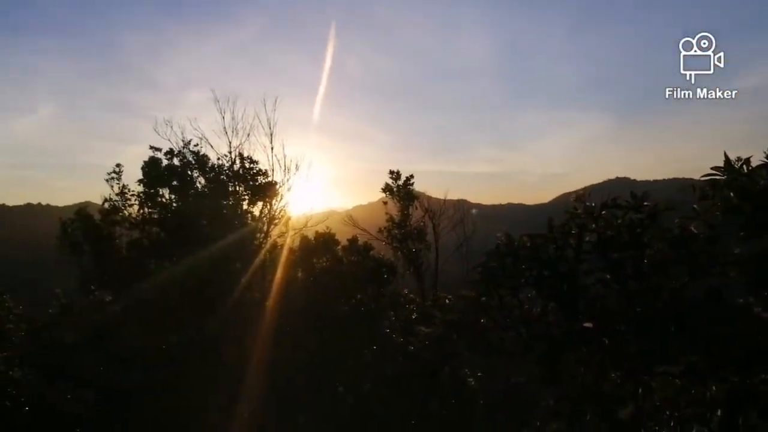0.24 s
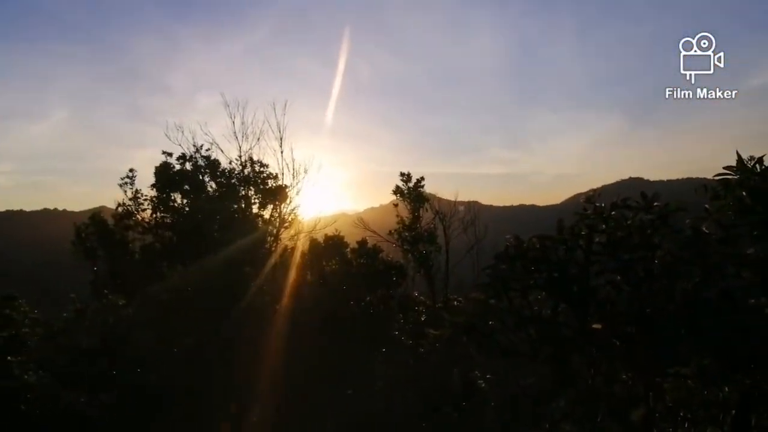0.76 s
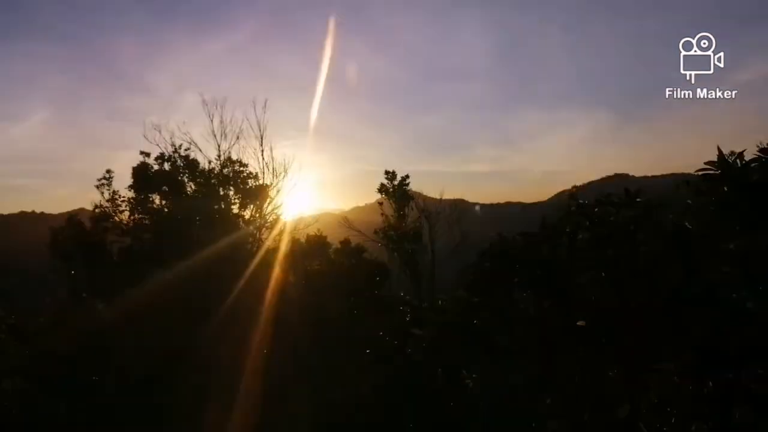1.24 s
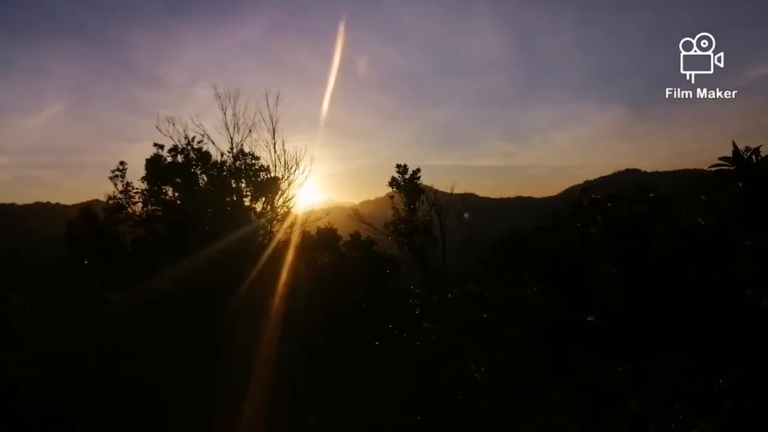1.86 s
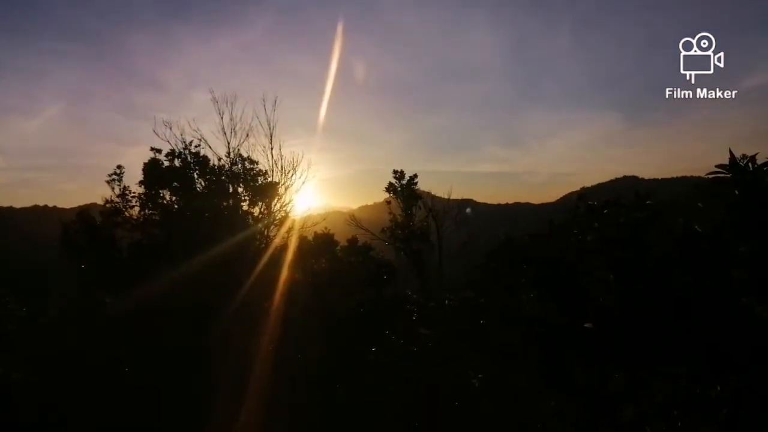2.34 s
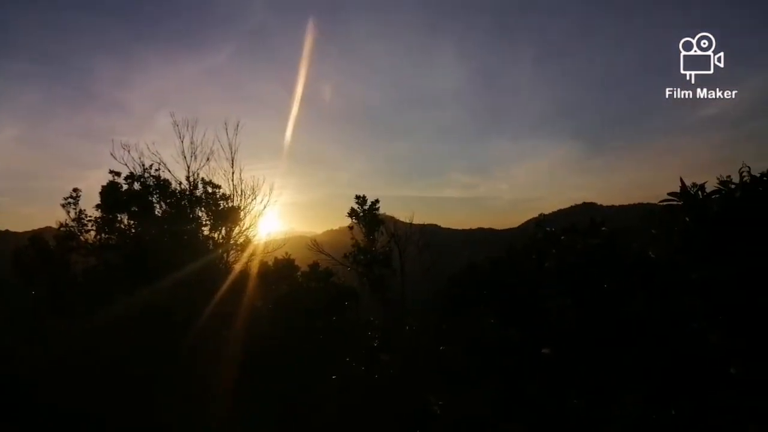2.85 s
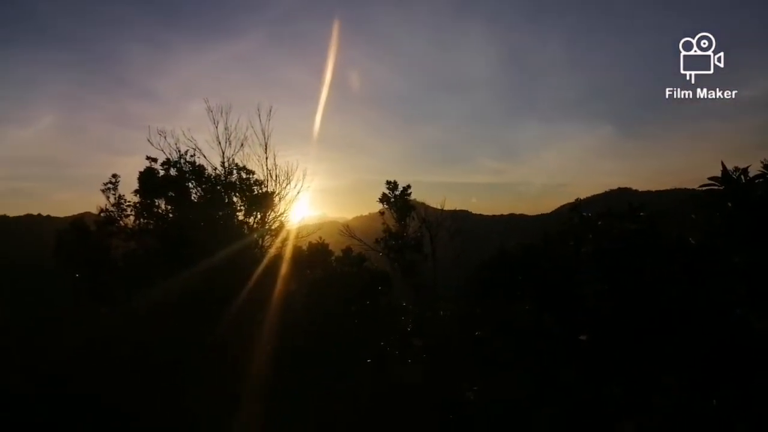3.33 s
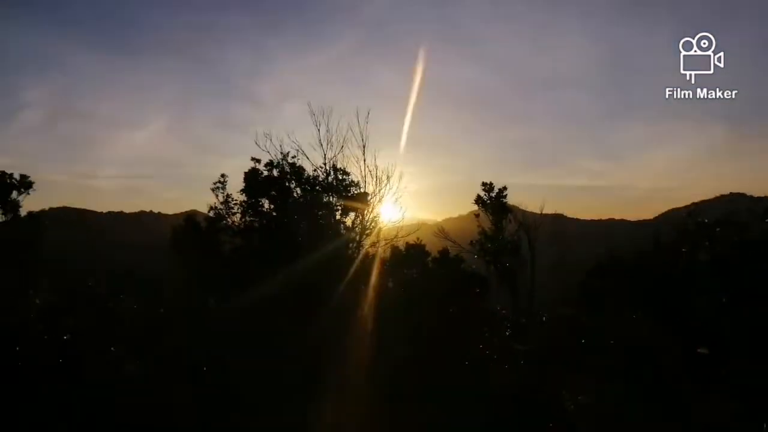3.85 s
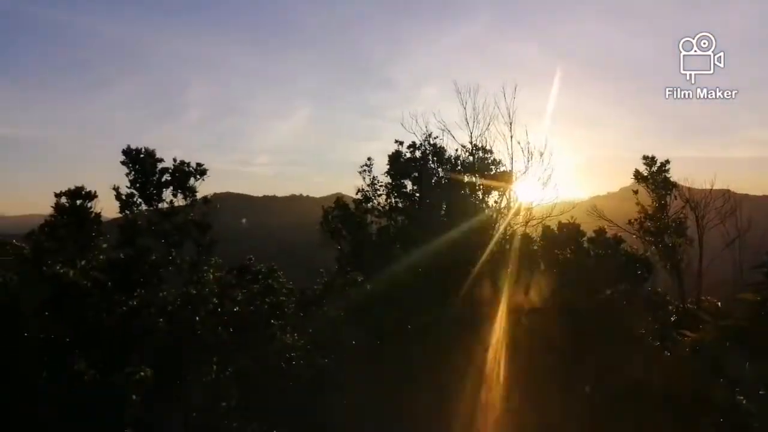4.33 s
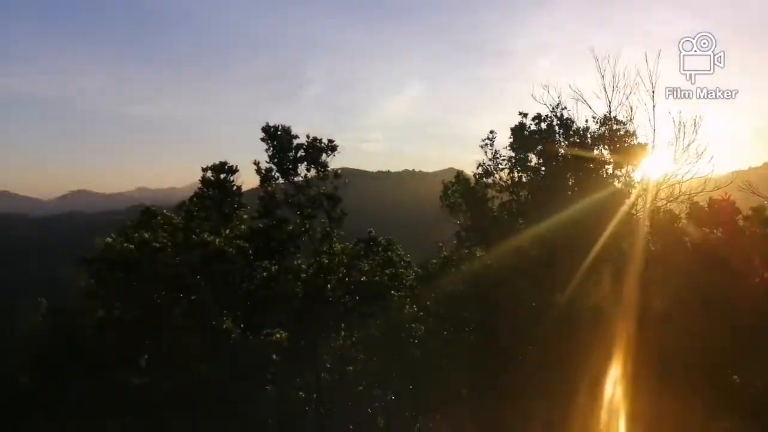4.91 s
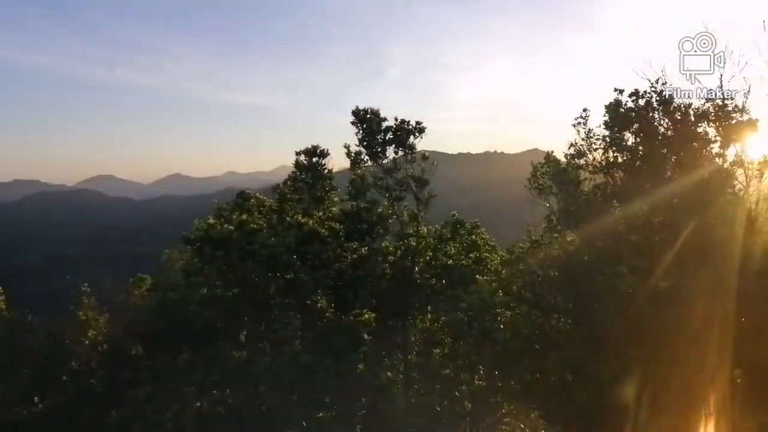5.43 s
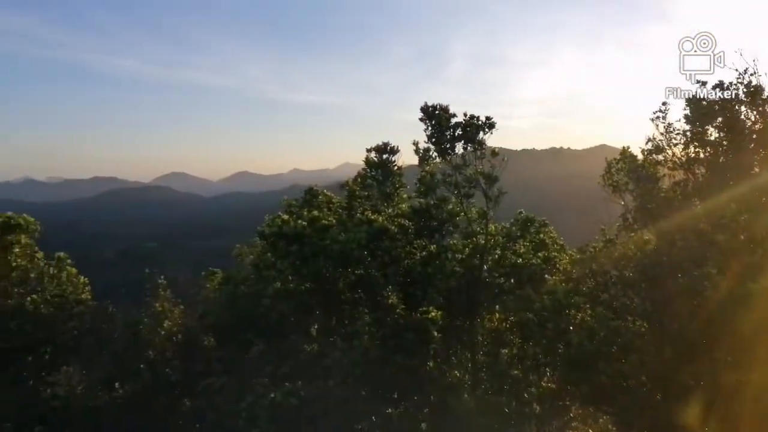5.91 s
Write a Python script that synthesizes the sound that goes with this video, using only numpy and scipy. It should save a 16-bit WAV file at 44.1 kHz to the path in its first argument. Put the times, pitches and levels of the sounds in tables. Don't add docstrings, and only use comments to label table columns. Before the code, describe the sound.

A stereo phone recording outdoors among trees: after two soft tries, a small bird on the right settles into regular, crisp chips, loudest past the middle, then duller as it turns away while neighbours answer more strongly. Far birds whistle thinly with short leafy echoes. A low insect wing hum comes and goes beneath, with soft wind rumble, a pop on the left, small ticks, one sharp clack and late dull thuds.

```python
import sys
import numpy as np
from scipy import signal
from scipy.fft import rfft, irfft, next_fast_len
from scipy.io import wavfile
from scipy.ndimage import uniform_filter1d, map_coordinates

SR = 44100
rng = np.random.default_rng(int(sys.argv[2]) if len(sys.argv) > 2 else 0)


def rack_gain(trim_db):
    fader = np.asarray(trim_db, float)
    return 10 ** (fader / 20)


def wav_out(sig):
    wavfile.write(sys.argv[1], SR, np.round(np.clip(np.atleast_2d(sig).T, -1, 1) * 32767).astype(np.int16))


N = 272097
TIME = np.arange(N) / SR

# time in seconds, level in dB.
FLOCK = [(0, -101), (.2, -73), (.4, -79), (.7, -84.5), (2.3, -93.5), (2.84, -90.5), (2.97, -77),
         (3.2, -87.5), (3.37, -82.5), (4.24, -75), (5.5, -84), (6.17, -76.5)]


def unit(x):
    return x / np.sqrt(np.mean(x ** 2) + 1e-20)


def along(points, hz):
    f, value = np.transpose(points)
    return np.interp(np.log(hz + 1), np.log(f + 1), value)


def flock_db():
    return np.interp(TIME, *np.transpose(FLOCK))


def wobble(rate):
    return map_coordinates(rng.standard_normal(int(N * rate / SR) + 4), [np.arange(N) * rate / SR])


def rasp(n, depth_db):
    knots = rng.standard_normal(n // 120 + 4)
    return rack_gain(depth_db * map_coordinates(knots, [np.arange(n) / 120]))


def filtered(x, response):
    m = next_fast_len(N + SR // 2)
    return irfft(rfft(x, m) * response(np.fft.rfftfreq(m, 1 / SR)), m)[..., :N]


def sides(pan_db):
    pair = rack_gain([[pan_db / 2], [-pan_db / 2]])
    return pair / pair.mean()


def add(track, s, sound):
    part = track[:, max(round(s * SR), 0):][:, :sound.shape[1]]
    part += sound[:, :part.shape[1]]


def bearing(s):
    # time in seconds, left-right balance in dB.
    turning = [(0, -15.5), (1, -16), (1.8, -15.5), (2.6, -18.5), (3.35, -14), (3.7, -10.5), (4.7, -11.5),
               (5.2, -8), (6.17, -11.5)]
    return np.interp(s, *np.transpose(turning))


def tails(count):
    # frequency in Hz, time to fall 60 dB in seconds.
    slopes = [(1000, 0.039), (2700, 0.35), (5500, 0.33), (9000, 0.24)]
    # frequency in Hz, echo colour in dB.
    echo_colour = [(2000, 1), (2700, 0.26), (5500, -0.5), (8200, 4.5), (14000, 10)]
    build_s = 0.008
    hz, t, z = signal.stft(rng.standard_normal((count, 2, SR * 2 // 5)), SR, nperseg=256)
    decay = rack_gain(-60 * t / along(slopes, hz)[:, None])
    plain = z * decay * (1 - np.exp(-t / build_s))
    coloured = plain * rack_gain(along(echo_colour, hz))[:, None]
    tail = signal.istft(coloured, SR, nperseg=256)[1]
    colour_gain = np.linalg.norm(coloured) / np.linalg.norm(plain)
    return tail / np.linalg.norm(tail, axis=2, keepdims=True) * colour_gain


def placed(note, tail, pan_db, echo_db, spread, stir_db=0):
    out = rack_gain(echo_db) * sides(spread * pan_db) * signal.fftconvolve(note[None], tail, axes=1)
    if stir_db:
        out *= unit(np.array([rasp(out.shape[1], stir_db), rasp(out.shape[1], stir_db)]))
    left, right = sides(1.92 * pan_db)
    add(out[:1], 0, left * note[None])
    add(out[1:], 0.00027, right * note[None])
    return out


def glide(length, from_hz, to_hz, bend, edge):
    u = np.linspace(0, 1, round(length * SR))
    phase = 2 * np.pi * np.cumsum(from_hz + (to_hz - from_hz) * u ** bend) / SR
    ramp = np.clip(np.minimum(u / edge, (1 - u) / (1.17 * edge)), 0, 1)
    return phase, np.sin(np.pi / 2 * ramp) ** 2


def air():
    # frequency in Hz, density in dB per Hz.
    chorus_spectrum = [(53, -36.5), (90, -7), (156, 0), (293, -4.5), (368, -10), (580, -6), (1010, -11),
                       (1620, -13), (2280, -7), (2710, -8), (3400, -16), (4700, -19), (5570, -14.5),
                       (6490, -22.5), (8470, -39), (11000, -51.5), (18600, -120)]
    # frequency in Hz, left-right balance in dB.
    chorus_lean = [(100, -3.5), (1000, -2), (3000, -5.5), (7000, -12.5), (12000, 15.5)]
    # frequency in Hz, density in dB per Hz.
    rumble = [(8.8, -19), (15, -7.5), (48, 9.5), (118, 3.5), (130, 7.5), (170, -44.5), (290, -120)]
    # centre in seconds, level in dB over the calm, half width in seconds.
    gusts = [
        (.15, 12.5, 0.23),
        (1.15, 6, 0.16),
        (2.049, 5.5, 0.34),
        (2.6, 4, 0.28),
        (4.05, 11, 0.16),
        (4.85, 5.5, 0.52),
        (5.601, 6, 0.16),
        (5.9, 14, 0.17),
        (6.12, 4, 0.11),
    ]
    calm_db = -76.5
    z = signal.stft(rng.standard_normal((2, N)), nperseg=512)[2]
    patches = uniform_filter1d(uniform_filter1d(rng.standard_normal(z.shape[1:]), 4, 0), 12, 1)
    pair = signal.istft(z * rack_gain(2.66 * unit(patches)), nperseg=512)[1][:, :N]
    lean = [[0.5], [-0.5]]
    hiss = unit(filtered(pair, lambda hz: rack_gain(along(chorus_spectrum, hz) + along(chorus_lean, hz) * lean)))
    lumps = rack_gain(4.5 * np.array([wobble(3.2), wobble(11)]))
    buffet = unit(lumps * filtered(rng.standard_normal((2, N)), lambda hz: rack_gain(along(rumble, hz))))
    wind_db = calm_db + sum(db * np.exp(-((TIME - s) / width) ** 2) for s, db, width in gusts)
    chorus_db = -69.5 + 0.14 * (flock_db() + 82)
    return rack_gain(chorus_db + 7.5) * hiss + rack_gain(wind_db + 5.0) * buffet


def chatter():
    # frequency in Hz, density in dB per Hz.
    squeaks = [(3500, -35.5), (4500, -9.5), (6000, -10.5), (7500, 3), (8400, -9.5), (9000, -26.5)]
    haze = unit(filtered(rng.standard_normal((2, N)), lambda hz: rack_gain(along(squeaks, hz))))
    return rack_gain(flock_db() - 3.5 + 2.9 * wobble(30)) * sides(-20.5) * haze


def insect():
    # start in seconds, length in seconds, wing beat in Hz, level in dB,
    # extra push at the start in dB.
    flights = [(0.954, 0.29, 168.5, -72, 11.5), (1.24, 0.31, 152.3, -61, -8.5),
               (1.651, 0.23, 148, -61, 0.5), (1.85, 0.3, 158, -61, 3), (2.081, 0.12, 144.7, -59.5, 3.5),
               (2.175, 0.55, 153.4, -60.5, 8.5), (2.725, 0.51, 150, -59, -5), (3.758, 0.17, 122.6, -62, 1),
               (3.854, 0.047, 142, -55.5, 1), (3.916, 1.27, 151.8, -59, 13), (5.161, 0.32, 152.1, -61, -6)]
    rise_s, fall_s, push_s, sag_per_db = 0.045, 0.11, 0.05, 0.004
    out, waver, flutter_db = np.zeros(N), 1 + 0.02 * wobble(25), 2.8 * wobble(27)
    for s, length, hz, db, push_db in flights:
        span = slice(round(s * SR), round((s + length) * SR))
        t = np.arange(span.stop - span.start) / SR
        near = np.clip(np.minimum(t / rise_s, (length - t) / min(fall_s, length / 2)), 0, 1)
        push = push_db * np.exp(-np.clip(t - rise_s / 2, 0, None) / push_s)
        phase = 2 * np.pi * np.cumsum(hz * waver[span] * (1 - sag_per_db * push)) / SR
        beat = np.sin(phase) + rack_gain(-21.5) * np.sin(2 * phase)
        out[span] += near * rack_gain(db + 2.5 + push + flutter_db[span]) * beat
    return out * sides(-6.3)


def handling():
    # start in seconds, level in dB, leak time in seconds.
    pops = [
        (.1176, -5.5, 0.0036),
        (.8005, -17.5, 0.0013),
        (.811, -14, 0.012),
    ]
    # start in seconds, level in dB, pitch in Hz, 60 dB
    # decay in seconds, left-right balance in dB.
    knocks = [
        (3.16, -51.5, 241, 0.082, 26),
        (3.946, -46.5, 268, 0.03, -14),
        (5.544, -50, 61, 0.15, -20),
        (5.811, -39, 41.7, 0.28, -18),
        (5.856, -46, 93, 0.15, -15),
    ]
    # start in seconds, level in dB, centre in Hz, 60 dB decay in seconds, left-right balance in dB.
    ticks = [
        (0.183, -39.5, 7560, 0.0094, -22),
        (0.613, -61, 600, 0.003, 8),
        (1.036, -49.5, 400, 0.01, -13),
        (3.165, -44, 5000, 0.004, 5),
        (3.946, -43, 6500, 0.0052, -10),
        (4.217, -50, 6000, .006, -6),
        (5.7085, -25.5, 1730, 0.0072, -8.5),
        (5.717, -34.5, 1290, 0.022, 7),
        (5.711, -41.5, 2280, 0.41, -6),
    ]
    t, out = np.arange(SR // 2) / SR, np.zeros((2, N))
    steps = np.zeros((len(pops), N))
    for row, (s, db, leak) in zip(steps, pops):
        rebound = 0.08 * (1 - np.exp(-t / 0.022)) * np.exp(-t / 0.065)
        add(row[None], s, rack_gain(db) * (np.exp(-t / leak) - rebound)[None])
    out[0] += steps[0] + filtered(steps[1:].sum(0), lambda hz: 1 / (1 + (125 / (hz + 1)) ** 8))
    out[0, :len(t)] -= rack_gain(-39) * np.exp(-t / 0.086)
    for s, db, hz, t60, pan_db in knocks:
        thud = np.sin(2 * np.pi * hz * t) * (1 - np.exp(-t * hz * 4))
        add(out, s, rack_gain(db - 60 * t / t60) * sides(pan_db) * thud)
    f = np.fft.rfftfreq(len(t), 1 / SR)
    for s, db, hz, t60, pan_db in ticks:
        width_hz = 0.75 * hz
        ring = irfft(1j * f * width_hz / (hz * hz - f * f + 1j * f * width_hz), len(t))
        scrape = rng.standard_normal(len(t)) * rack_gain(-60 * t / t60)
        burst = signal.fftconvolve(scrape, ring)[:len(t)]
        add(out, s, rack_gain(db) * sides(pan_db) * burst / np.abs(burst).max())
    return out


def whistlers(rows, gain_db, echo_db, rasp_db, aside_db, shade_db):
    out, places = np.zeros((2, N)), tails(count=8)
    for k, (s, length, from_hz, to_hz, db) in enumerate(rows):
        octaves = np.log2((from_hz + to_hz) / 8000)
        pan_db = bearing(s) + aside_db - shade_db * octaves
        phase, shape = glide(length, from_hz, to_hz, bend=0.9, edge=0.2)
        tone = np.sin(phase) + rack_gain(-30) * np.sin(2 * phase)
        note = shape * unit(rasp(len(phase), rasp_db)) * tone
        wet_db = echo_db + 4 * octaves
        add(out, s, rack_gain(db + gain_db) * placed(note, places[k % len(places)], pan_db, wet_db, spread=0.8))
    return out


def other_birds():
    # start in seconds, length in seconds, start pitch in Hz, end pitch in Hz, level in dB.
    whistles = [(0.156, 0.04, 3460, 3700, -67.5), (0.193, 0.079, 3160, 3530, -67.5),
                (.33, .28, 3083, 3010, -75), (1.3, 0.035, 2110, 2060, -73),
                (2.756, 0.033, 2335, 1610, -61.5), (3.088, 0.016, 2140, 3600, -61),
                (3.1, 0.04, 3620, 3830, -66), (3.142, 0.0092, 1950, 2550, -66),
                (3.131, 0.0088, 1780, 1900, -58.5), (3.156, 0.015, 6860, 6810, -55.5),
                (3.598, 0.035, 3750, 4080, -59), (3.628, 0.015, 4050, 4690, -52.5),
                (3.763, 0.017, 2500, 1620, -62), (3.97, 0.036, 2445, 2430, -57),
                (3.99, 0.027, 4880, 4920, -66), (4.085, 0.0096, 4470, 5220, -53.5),
                (4.1, 0.033, 4630, 4360, -62.5), (4.45, 0.14, 4250, 3930, -71),
                (5.01, 0.22, 3880, 3440, -76.5), (5.036, 0.31, 2550, 2656, -62),
                (5.281, 0.26, 2726, 2366, -59.5), (5.53, 0.05, 3970, 3660, -66),
                (5.776, 0.015, 4000, 3610, -56.5), (5.87, 0.061, 3720, 3390, -63),
                (6.004, 0.021, 3650, 3850, -62)]
    left_whistles = [
        (2.328, 0.144, 1860, 1828, -69.5),
        (3.22, 0.066, 2545, 2383, -61.5),
    ]
    flicks = [(.0, 0.026, 4530, 3510, -59), (.025, 0.0215, 4170, 3250, -57.5),
              (2.869, 0.0064, 6050, 7370, -58), (2.893, .012, 5200, 4200, -64.5),
              (2.901, 0.014, 7910, 5430, -62), (3.214, 0.01, 5550, 8530, -55.5),
              (3.315, 0.013, 5920, 4200, -58), (3.41, .015, 4630, 3000, -69.5),
              (3.497, 0.0089, 8100, 6620, -53), (3.848, 0.014, 7500, 6250, -46),
              (3.885, 0.02, 6300, 5670, -53), (4.083, .014, 8300, 6400, -54.5),
              (4.098, 0.0087, 3170, 8850, -52), (4.212, .012, 6130, 8260, -56),
              (4.232, 0.017, 6120, 4780, -64), (4.246, 0.0088, 4850, 6200, -66.5),
              (3.118, 0.013, 5550, 3970, -70), (2.862, 0.0084, 2320, 3330, -64),
              (3.322, 0.011, 8000, 6030, -61), (6.035, 0.014, 5630, 4240, -64),
              (4.385, 0.011, 3000, 5140, -63)]
    coos = [(.015, 0.023, 9000, 6960, -67), (.2, 0.28, 1517, 1307, -64), (1.8, 0.28, 1440, 1269, -65),
            (2.48, 0.26, 1400, 1254, -71), (2.835, 0.014, 1610, 1670, -63.5),
            (3.015, 0.013, 1620, 1730, -57.5), (3.13, 0.18, 1205, 1148, -64),
            (3.19, 0.069, 1540, 1526, -69), (3.27, 0.15, 1200, 1297, -64), (3.405, 0.025, 3100, 4200, -66),
            (3.24, 0.038, 5070, 4950, -71), (3.29, 0.036, 1890, 1870, -63),
            (3.375, 0.025, 1890, 1690, -54.5), (3.57, 0.023, 1390, 1500, -65),
            (3.632, 0.014, 8500, 9200, -70), (3.95, 0.016, 1910, 2040, -58),
            (4.379, 0.027, 3800, 4710, -60.5), (4.44, 0.067, 4280, 3820, -72),
            (5.09, 0.077, 5300, 5280, -74.5), (5.13, 0.023, 7300, 7200, -73),
            (5.331, 0.25, 1228, 1310, -64), (5.76, 0.22, 1500, 1176, -62.5),
            (5.78, 0.023, 7250, 7900, -69.5)]
    veiled = [(.225, .03, 6300, 8200, -64.5), (3.015, 0.016, 4300, 3300, -63),
              (3.302, 0.015, 7860, 6200, -59), (3.53, .012, 8200, 5900, -62), (3.625, .03, 7570, 9200, -68),
              (3.9, .015, 8000, 6040, -71), (4.085, 0.022, 9300, 6400, -63), (4.13, 0.013, 8000, 5780, -74),
              (4.225, 0.017, 8300, 6600, -69), (4.42, .03, 3200, 4970, -62), (4.49, .03, 4800, 3140, -68),
              (4.595, 0.017, 5400, 3750, -57.5), (4.635, 0.016, 5300, 3800, -70),
              (4.79, 0.034, 3600, 2000, -61), (4.886, .014, 4820, 3370, -73),
              (5.6, 0.03, 4600, 3050, -59.5)]
    out = whistlers(whistles, gain_db=1.5, echo_db=0, rasp_db=2.5, aside_db=-1.5, shade_db=0)
    out += whistlers(left_whistles, gain_db=1.5, echo_db=-2.5, rasp_db=1.5, aside_db=30, shade_db=0)
    out += whistlers(flicks, gain_db=0.3, echo_db=-1, rasp_db=3, aside_db=-5, shade_db=5)
    out += whistlers(coos, gain_db=-6.0, echo_db=9.0, rasp_db=7.0, aside_db=-2.5, shade_db=6.0)
    out += whistlers(veiled, gain_db=-9.5, echo_db=12, rasp_db=13.5, aside_db=-3.5, shade_db=10.5)
    return out


def chip(hz, second_db, top_db, grace, note, grace_db, third_db, grace_s, note_s, edge, break_s, depth, swell_db):
    # harmonic number, level in dB.
    upper = [(3, -28), (4, -39), (5, -27.5)]
    phase, shape = glide(grace_s, grace[0] * hz, grace[1] * hz, bend=0.7, edge=0.33)
    opening = np.linspace(0, 1, len(phase))
    third = rack_gain(third_db) * rasp(len(phase), 2.5) * np.sin(3 * phase)
    overtones = rack_gain(third_db - 7) * np.sin(2 * phase) + third
    grace_note = rack_gain(grace_db) * shape * ((0.22 + opening) * np.sin(phase) + (1.5 - opening) * overtones)

    phase, shape = glide(note_s, note[0] * hz, note[1] * hz, bend=0.812, edge=edge)
    t = np.arange(len(phase)) / SR
    dip = 1 - depth * np.exp(-((t - break_s) / 0.0017) ** 2)
    swell = rack_gain(swell_db * np.exp(-(t / 0.011) ** 2))
    harmonics = sum(rack_gain(db) * np.sin(k * phase) for k, db in upper)
    top = rack_gain(top_db + 2.5) * swell * unit(rasp(len(phase), 6.2)) * harmonics
    octave = rack_gain(second_db + 2.5) * swell * unit(rasp(len(phase), 4.3)) * np.sin(2 * phase)
    fundamental = swell ** 0.3 * rasp(len(phase), 1.2) * np.sin(phase)
    overlap = round(0.0055 * SR)
    out = np.r_[np.zeros(len(grace_note) - overlap), shape * dip * (fundamental + octave + top)]
    add(out[None], 0, grace_note[None])
    return out


def chippers(rows, kind, gain_db, top_db, aside_db, spread, shade_db):
    out = np.zeros((2, N))
    for (s, db, hz, second_db, echo_db), tail in zip(rows, tails(len(rows))):
        note = chip(hz, second_db, top_db, **kind)
        sound = placed(note, tail, bearing(s) + aside_db, echo_db, spread, stir_db=2.0)
        add(out, s - kind["grace_s"] + 0.0015, rack_gain(db + gain_db) * sound)
    return filtered(out, lambda hz: rack_gain(np.log2(hz / 2700 + 0.01) * [[-shade_db], [0]]))


def neighbours():
    # time in seconds, peak in dB, pitch in Hz, leaf cover as extra echo in dB.
    answers = [(0.266, -54.5, 2666, 0.5), (0.7275, -39, 2694, 1), (0.9436, -60, 2460, 1),
               (1.064, -42.5, 2689, 1.8), (1.5514, -59.5, 2478, -1.6), (1.938, -54.5, 2541, -2.5),
               (2.508, -63, 2510, -1.8), (2.9312, -46.5, 2735, -1), (3.5034, -42, 2686, 0.5),
               (3.5265, -54.5, 2723, -7.5), (3.834, -54.5, 2715, 1), (3.851, -37.5, 2753, -3.5),
               (4.4665, -34, 2587, -3), (4.5452, -58, 2607, -1.5), (5.176, -35, 2719, 1),
               (5.5835, -34, 2630, -2), (5.692, -31, 2611, -4.5), (6.0781, -38.5, 2789, 1)]
    shape = dict(grace=(0.76, 0.92), note=(0.97, 1.03), grace_db=-11, third_db=-28, grace_s=0.016,
                 note_s=0.022, edge=0.14, break_s=0.012, depth=0.4, swell_db=-1.5)
    rows = []
    for s, db, hz, cover_db in answers:
        octave_db = -3.5 + 0.0639 * (hz - 2650)
        echo_db = 6.5 - 0.7 * (db + 39.5) + cover_db
        rows.append((s, db, hz, octave_db, echo_db))
    return chippers(rows, shape, gain_db=-3.5, top_db=-2.0, aside_db=9.5, spread=0.93, shade_db=6)


def same_singer(rows, hz, echo_db):
    return [(s, db, hz, octave_db, echo_db) for s, db, octave_db in rows]


def near_bird():
    # time in seconds, peak in dB, octave level in dB.
    warming = [
        (0.07, -42.5, -11.5),
        (0.631, -39.5, -7.5),
    ]
    facing = [
        (1.0015, -28.5, 1),
        (1.4207, -29, -2),
        (1.7705, -28.5, -1),
        (2.174, -29.5, -0.5),
        (2.5584, -29.5, -2),
        (2.9801, -29.5, -2.5),
        (3.3692, -30, -1.5),
        (3.685, -26, 0),
        (4.0376, -27.5, -4.5),
    ]
    turned = [
        (4.4035, -32.5, -7.5),
        (4.7265, -33, -8),
        (5.151, -35.5, -5),
        (5.494, -34.5, -8),
        (5.83, -33.5, -7.5),
        (6.143, -34.5, -9),
    ]
    warming_chip = dict(grace=(0.66, 0.83), note=(0.98, 1.015), grace_db=-8, third_db=-4, grace_s=0.02,
                        note_s=0.026, edge=0.25, break_s=0.008, depth=0.3, swell_db=-10)
    facing_chip = dict(grace=(0.70, 0.78), note=(0.965, 1.06), grace_db=-10, third_db=-6, grace_s=0.015,
                       note_s=0.027, edge=0.16, break_s=0.0135, depth=0.75, swell_db=-5)
    turned_chip = dict(grace=(0.68, 0.82), note=(0.965, 1.075), grace_db=-12, third_db=-20, grace_s=0.014,
                       note_s=0.034, edge=0.17, break_s=0.019, depth=0.45, swell_db=-9)
    out = chippers(same_singer(warming, hz=2746, echo_db=-3.5), warming_chip,
                   gain_db=3.0, top_db=-6, aside_db=7.0, spread=0.88, shade_db=10.5)
    out += chippers(same_singer(facing, hz=2694, echo_db=-3.5), facing_chip,
                    gain_db=-4.5, top_db=-2, aside_db=-0.5, spread=0.44, shade_db=8.5)
    add(out, 0.032, rack_gain(-23.5) * out.copy())
    out += chippers(same_singer(turned, hz=2689, echo_db=-1.6), turned_chip,
                    gain_db=1.0, top_db=3.5, aside_db=1.7, spread=0.56, shade_db=3.0)
    return out


def scene():
    # frequency in Hz, gain in dB.
    port_loss = [(6000, -0.5), (8200, -13), (8900, -17.5), (15000, -32)]
    voices = near_bird() + neighbours() + other_birds()
    through_ports = filtered(voices + handling(), lambda hz: rack_gain(along(port_loss, hz)))
    return through_ports + insect() + chatter() + air()


def top_cut(x):
    return signal.sosfilt(signal.butter(12, 15130, fs=SR, output="sos"), x)


def record(dry):
    # frequency in Hz, density in dB per Hz.
    self_noise = [(300, -8), (8000, -0.5), (12000, -2.5), (14500, -5), (15100, -10)]
    hiss = unit(filtered(rng.standard_normal((2, N)), lambda hz: rack_gain(along(self_noise, hz))))
    return top_cut(dry + rack_gain(-86.0) * hiss)


dry = scene()
out = record(dry)
wav_out(out)
```